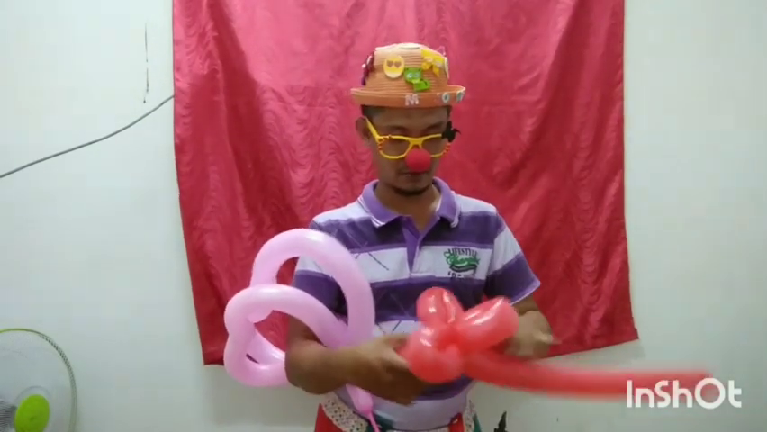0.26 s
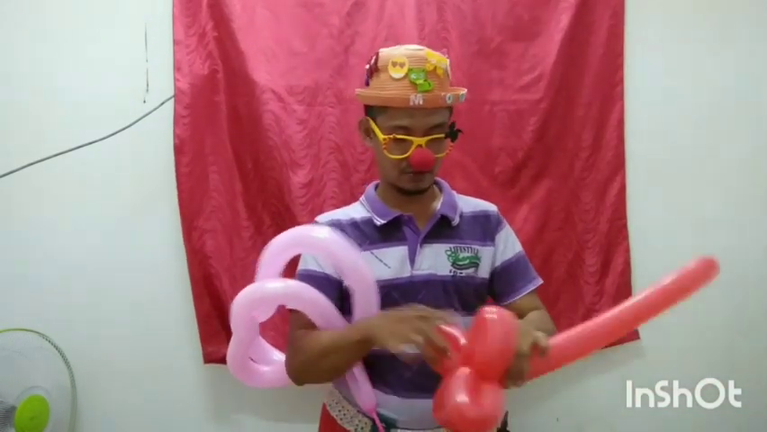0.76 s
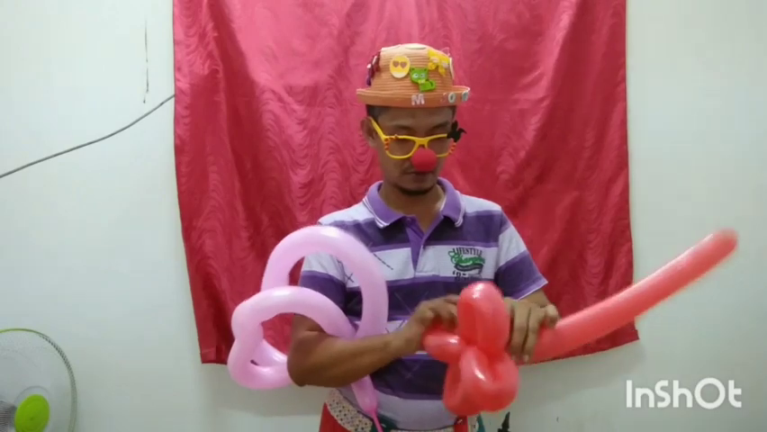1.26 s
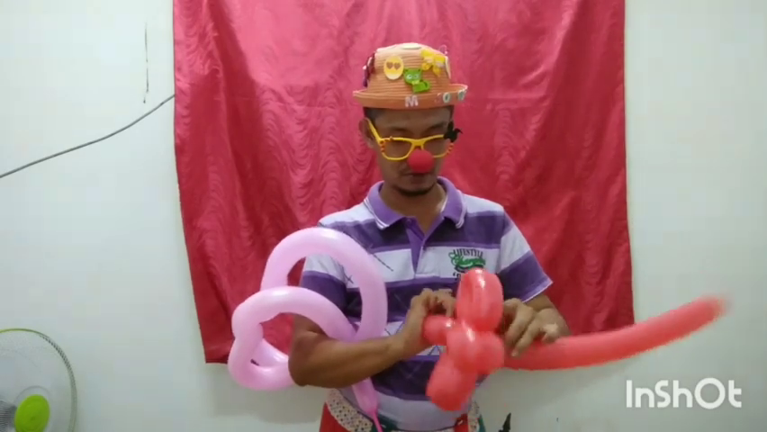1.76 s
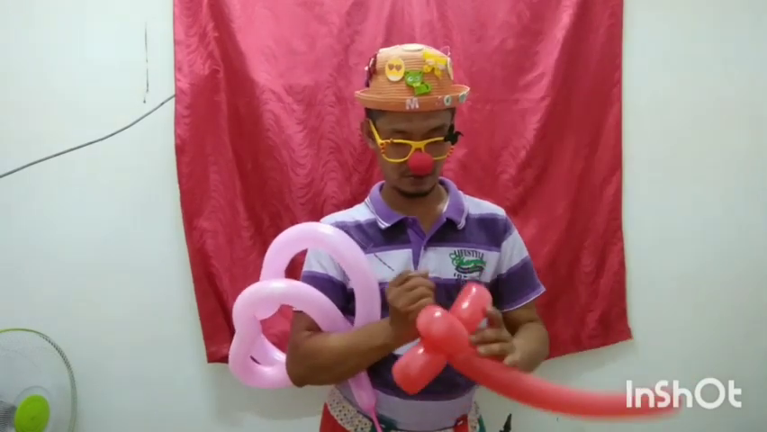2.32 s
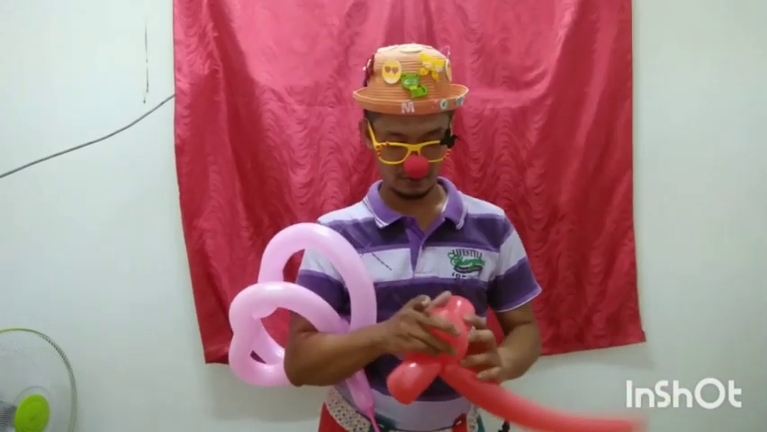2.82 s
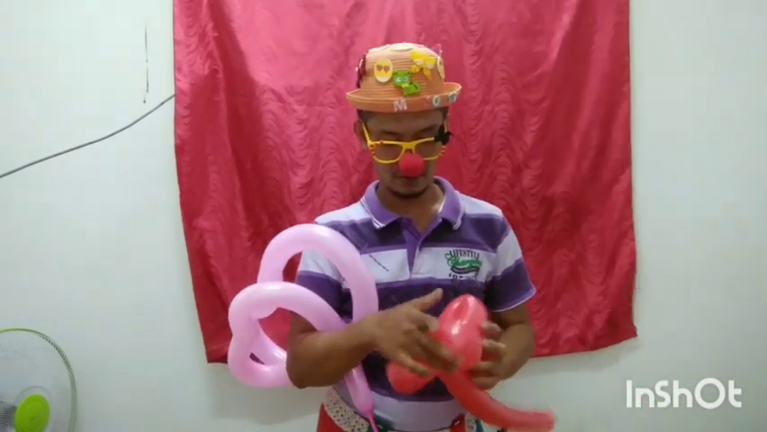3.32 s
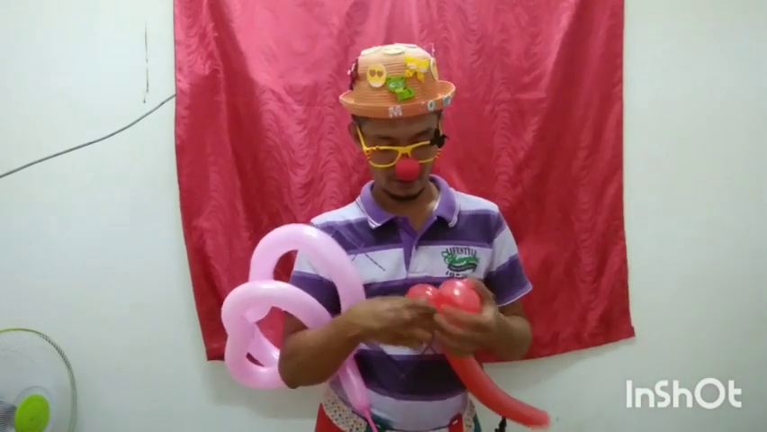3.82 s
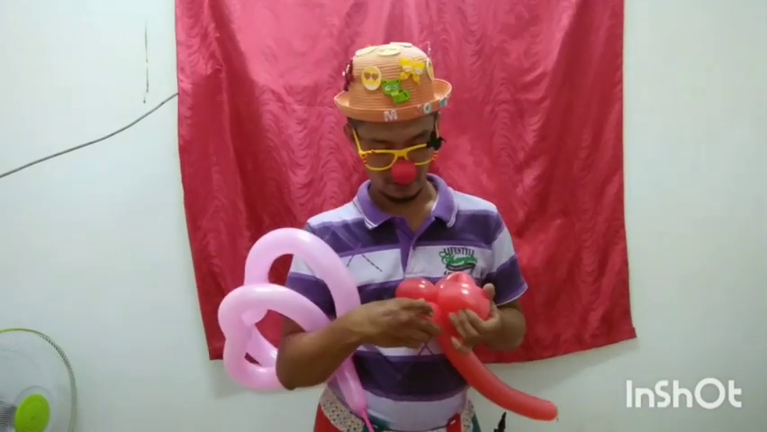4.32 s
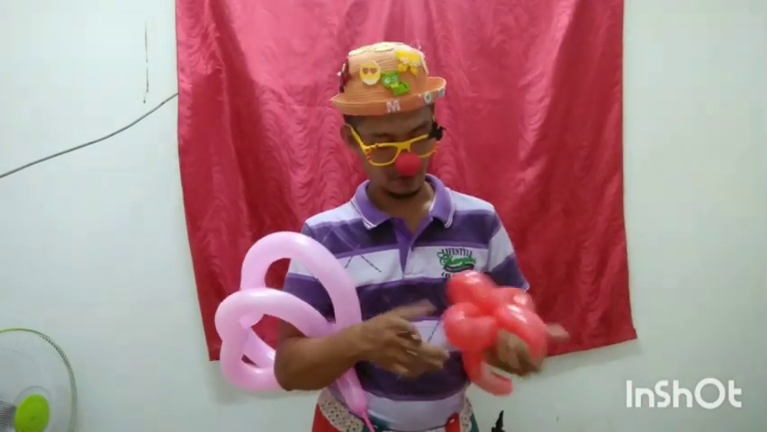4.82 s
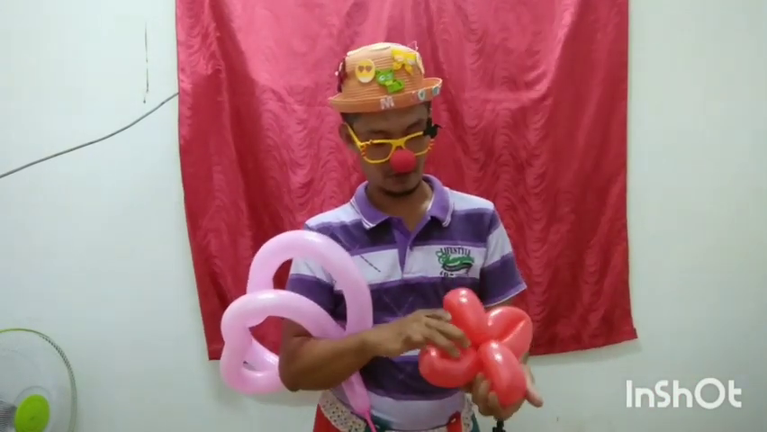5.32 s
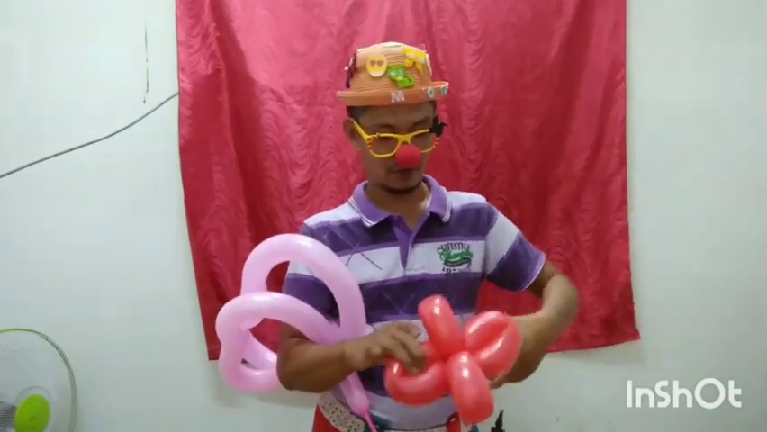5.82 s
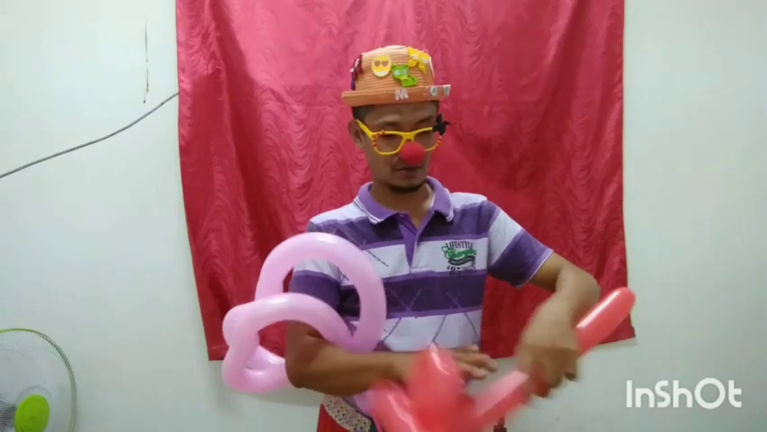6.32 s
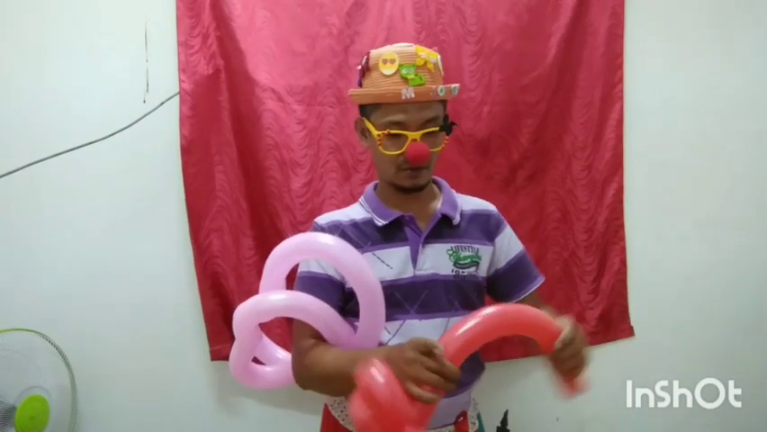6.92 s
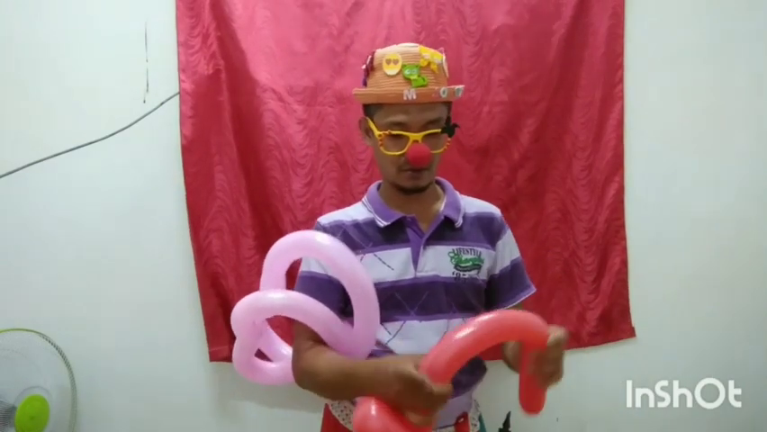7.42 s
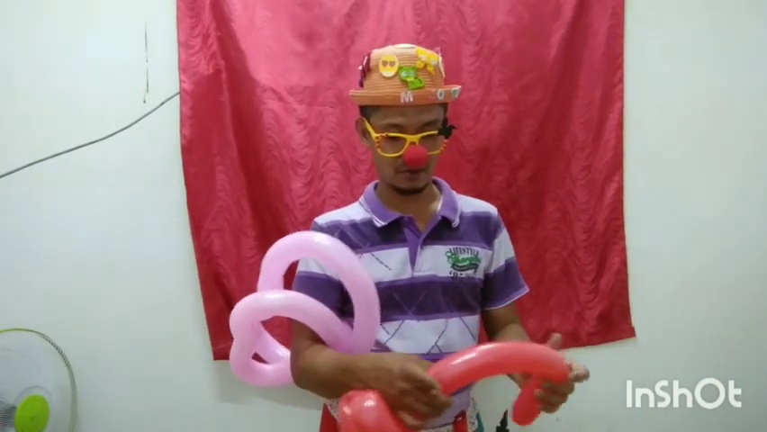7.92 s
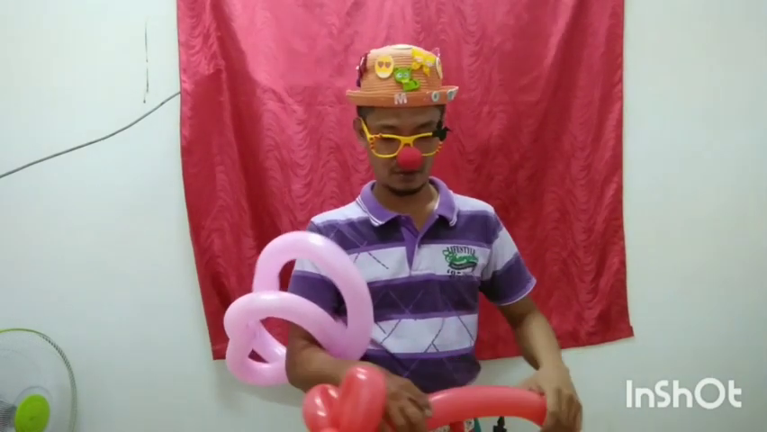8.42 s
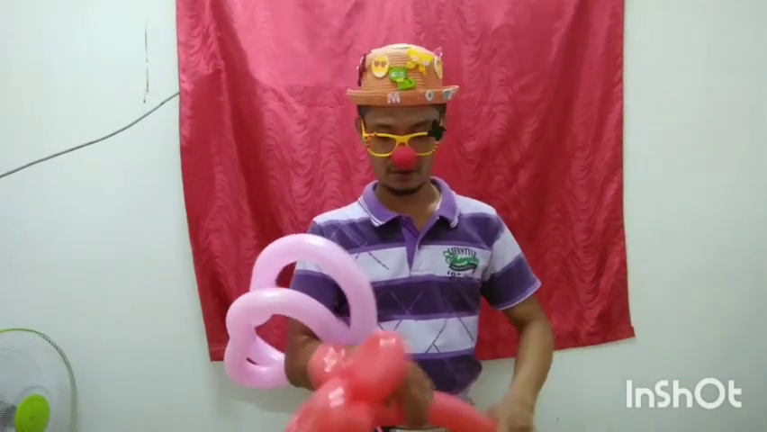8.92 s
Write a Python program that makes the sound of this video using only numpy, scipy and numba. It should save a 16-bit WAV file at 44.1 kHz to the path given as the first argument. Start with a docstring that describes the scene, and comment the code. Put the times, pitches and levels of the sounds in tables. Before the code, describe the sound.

Hands twist a long balloon, making uneven rubbery creaks, crackles and snaps, with short pauses and a faint hum behind.

```python
"""Latex balloons, twisted and rubbed by hand in bursts, two metres from a phone in a small bare room.
Swarms of stick-slip clicks ring the skin and the air inside; folds grip, then snap loose.
Even slipping groans, a dragged finger squeals, the bundle knocks against the palm.
A fan runs behind; the phone's gate ducks the pauses."""
import sys
import numpy as np
from scipy import signal
from scipy.fft import rfft, irfft, next_fast_len
from scipy.io import wavfile
from scipy.ndimage import uniform_filter1d
from numba import njit

SR = 44100
rng = np.random.default_rng(int(sys.argv[2]) if len(sys.argv) > 2 else 0)


def store_wav(level_fs):
    """Save 16-bit WAV to argv[1]."""
    pcm = np.round(np.clip(np.atleast_2d(level_fs), -1, 1) * 32767)
    wavfile.write(sys.argv[1], SR, pcm.T.astype(np.int16))


N = 403956

# folds slipping loose: (time [s], level [dB], relative low-band level [dB])
FOLD_SNAPS = [(0.227, -45, -19), (0.341, -38, -10), (0.408, -14.5, -6), (1.495, -13.5, -8.5),
              (2.13, -11.5, -4), (2.5539, -23, -26), (2.805, -9.5, -13.5), (2.8239, -10, -17.5),
              (3.717, -29.5, -31), (3.8784, -35, -17), (3.9842, -4, -8.5), (5.1027, -31, -14),
              (5.1928, -12, -21), (5.4487, -23, -17), (5.822, -32, -18), (6.2016, -33, -20),
              (6.3743, -41.5, -9), (6.4126, -11.5, -33), (7.1927, -30.5, -26.5), (7.3313, -23.5, -12),
              (7.5885, -9, -18), (7.7485, -19.5, -3), (7.8486, -17.5, -13), (8.1273, 0, -12.5),
              (8.317, -23, -6), (8.539, -26, -28), (8.6739, -20, -18)]
# skin scrape spectrum: (frequency [Hz], gain [dB])
SCRAPE_SPECTRUM = [(400, -63.5), (1500, -23.5), (2200, -3), (3000, 2), (4200, -3), (6000, -3), (8000, -20)]
# dry crackle spectrum: (frequency [Hz], gain [dB])
CRACKLE_SPECTRUM = [(1500, -56.5), (5000, -16.5), (7000, -2.5), (9000, -1), (12000, 1), (14500, -10),
                    (16500, -10.5)]


def rubbing():
    """Swarms of slips excite skin and air; the resonances move as the bubbles are squeezed."""
    # lower skin spectrum: (frequency [Hz], gain [dB])
    lower_spectrum = [(200, -54.5), (600, -16), (950, -0.5), (1200, 0), (1600, 3), (2100, -1.5),
                      (3000, -29)]
    envelope, lower_share, boom_share, crackle_share, air_hz = strokes()
    fine = slips(rate_hz=3500, spread_db=3.03, patchy_db=1.56)
    coarse = slips(rate_hz=500, spread_db=3.5, patchy_db=0.63)
    boom = unit(ring(coarse, air_hz, width_hz=320.)
                + 0.39 * ring(coarse, 0.62 * air_hz, width_hz=98.)
                + 0.27 * ring(coarse, 1.3 * air_hz, width_hz=300.))
    # less lower skin: tauter, higher ring
    lower_db = np.clip(20 * np.log10(lower_share), -16, 8)
    taut_hz = (2430 - 30.5 * lower_db) * undb(0.73 * walk(9))
    scrape = unit(shape(fine, SCRAPE_SPECTRUM, undb)) + undb(-13) * ring(fine, taut_hz, width_hz=450.)
    bubble_hz = 1450 * undb(1.33 * walk(7))  # smaller bubbles, wandering with the grip
    lower = unit(shape(fine, lower_spectrum, undb)) + 0.39 * ring(fine, bubble_hz, width_hz=250.)
    crackle = unit(shape(fine, CRACKLE_SPECTRUM, undb))
    return envelope * (scrape + lower_share * lower + crackle_share * crackle + boom_share * boom)


def strokes():
    """Rubs swell and fade; overlaps add in power, and the loudest dominates the timbre."""
    # hand rubs: (peak time [s], 20 dB swell [s], 20 dB fade [s], level [dB], relative lower skin [dB],
    # relative air boom [dB], relative crackle [dB], air resonance [Hz])
    rubs = [(0.009, 0.15, 0.058, -39, 1.5, -8, 5, 658), (0.151, 0.45, 0.105, -54.5, -0.5, -18.5, -9, 601),
            (0.243, 0.05, 0.046, -43.5, -5.5, -30, -23, 761), (0.347, 0.111, 0.167, -57, 4, -2.5, -5, 669),
            (0.416, 0.045, 0.098, -33, -9, -5, 4.5, 666), (0.567, 0.023, 0.078, -53.5, 1.8, 2, -11, 711),
            (0.696, 0.085, 0.393, -36, -1.5, -1, -1.5, 568), (0.859, 0.03, 0.62, -39, -4, 6.5, 0, 652),
            (1.027, 0.16, 0.099, -23.5, -3.7, -5.5, 0.2, 659), (1.163, 0.186, 0.15, -33, -8, 0, 1.8, 679),
            (1.267, 0.054, 0.19, -31, -10, -0.5, 0.5, 650), (1.401, 0.25, 0.052, -33, -10.5, 1, 0.0, 679),
            (1.507, 0.066, 0.12, -34.5, -7, -3, -10, 670), (1.762, 0.11, 0.1, -32, -0.4, 4.7, 4.5, 598),
            (1.849, 0.1, 0.14, -46, -2, 5.5, -9, 556), (2.026, 0.226, 0.12, -53.5, -0.1, 6.8, -4, 526),
            (2.168, 0.043, 0.11, -26.5, -7, -5, -1.7, 669), (2.323, 0.03, 0.16, -49.5, -6, -5, 4, 454),
            (2.566, 0.058, 0.117, -42, -14.3, -30, -1.5, 619), (2.705, 0.135, 0.52, -47, -2, -1.5, -1, 658),
            (2.817, 0.028, 0.131, -27, -3, -9.5, 4.5, 536), (2.968, 0.044, 0.1, -31, -7, -0.5, 0.4, 615),
            (3.109, 0.1, 0.14, -42, 2, 5, 0, 496), (3.256, 0.065, 0.096, -26.5, -19.5, -12.5, -0.5, 710),
            (3.742, 0.078, 0.11, -47, -9, -13, 4.5, 603),
            (3.912, 0.083, 0.484, -45.5, -6.5, -29.5, -4.9, 796),
            (3.993, 0.079, 0.17, -32, -1.4, -6, 1.9, 699), (4.127, 0.2, 0.085, -30, 0.3, -1, -1, 752),
            (4.225, 0.16, 0.31, -31, -0.9, -3, 1, 660), (4.34, 0.066, 0.11, -30.5, 1.2, 6.7, 1.2, 683),
            (4.459, 0.2, 0.088, -33.5, 0.1, 0.5, -1.5, 665), (4.656, 0.15, 0.11, -19.5, -2, -6, -0.3, 730),
            (4.831, 0.145, 0.16, -40, -4.5, -6.5, 4, 804), (4.958, 0.098, 0.089, -44.5, -1, -5, 4.8, 844),
            (5.127, 0.043, 0.09, -41.5, -2, -13, 3, 577), (5.196, 0.031, 0.466, -38.5, -9.5, -8, 0, 788),
            (5.275, 0.033, 0.12, -31, -2, -19.5, -5, 771), (5.351, 0.16, 0.13, -34, -7.5, -10.5, -1.5, 707),
            (5.457, 0.056, 0.103, -30, -7.5, -7.5, -2, 505),
            (5.561, 0.078, 0.082, -17.5, -8.5, -4.5, -2.8, 630),
            (5.685, 0.15, 0.083, -41.5, -17.5, -24, 6.5, 590),
            (5.857, 0.084, 0.14, -46, -2.5, -12.5, 1.1, 704), (6.105, 0.13, 0.092, -57.5, 3, 9.5, -18, 536),
            (6.233, 0.373, 0.098, -50.5, -7.5, -23, -17, 532),
            (6.433, 0.083, 0.092, -40, -6.5, -4, -0.5, 409),
            (6.577, 0.051, 0.206, -40.5, -12, -10.5, -8, 746),
            (6.651, 0.057, 0.142, -40.5, -2.5, -4.5, 4, 767),
            (6.848, 0.051, 0.19, -47.5, -4, -17, -13.0, 720),
            (7.21, 0.042, 0.13, -48.5, -9.5, 3.5, 12, 587), (7.345, 0.038, 0.155, -49.5, 2, 6, 6, 701),
            (7.429, 0.13, 0.12, -43, -4, -3, 4, 633), (7.518, 0.04, 0.168, -55.5, -4.3, -1.5, -14.4, 339),
            (7.59, 0.038, 0.095, -32, -3.5, -13, 0, 755),
            (7.649, 0.057, 0.177, -40.5, -22.4, -7.5, 4.3, 698), (7.757, 0.039, 0.103, -36, 0, 0, -1, 658),
            (7.859, 0.13, 0.092, -35.5, -12.5, -3, 6.5, 699), (8.084, 0.12, 0.029, -49, -12, -1.5, 8, 403),
            (8.135, 0.034, 0.062, -25.5, -4.5, -5, 4.5, 595), (8.19, 0.06, 0.117, -34, 0, -2.5, -15, 559),
            (8.302, 0.14, 0.1, -31, -4.5, -8.5, 3.3, 700),
            (8.564, 0.042, 0.069, -33.5, -11.5, -39, -2, 704), (8.684, 0.051, 0.14, -34.5, 0, -10, -9, 612),
            (8.858, 0.03, 0.15, -34, -3, -5, -1.7, 709), (8.951, 0.079, 0.056, -38, -4.5, -6, 4, 758),
            (9.086, 0.165, 0.21, -50.5, -3.5, -7, -11.3, 767)]
    peak_s, swell_s, fade_s, rub_db, lower_db, boom_db, crackle_db, air_hz = np.transpose(rubs)[:, :, None]
    t = np.arange(0, N / SR + 0.01, 0.002)
    from_peak = np.where(t < peak_s, (peak_s - t) / swell_s, (t - peak_s) / fade_s)
    power = undb(2 * rub_db - 40 * from_peak ** 1.166) + 1e-30  # exponent > 1 rounds the peak
    total = power.sum(axis=0)
    shares = [np.sqrt((power * undb(2 * db)).sum(axis=0) / total) for db in (lower_db, boom_db, crackle_db)]
    mean_air_hz = (power * air_hz).sum(axis=0) / total
    return [np.interp(np.arange(N) / SR, t, curve) for curve in (np.sqrt(total), *shares, mean_air_hz)]


def slips(rate_hz, spread_db, patchy_db):
    """Random stick-slip clicks, many small and few large, in uneven patches."""
    hit = rng.random(N) < rate_hz / SR
    size_db = spread_db * np.minimum(rng.exponential(1, N), 5.5) + patchy_db * walk(60)
    return hit * undb(size_db) * np.sign(rng.standard_normal(N))


def sticking():
    """Gain dip as the rubber grips just before a fold slips loose."""
    dip_db, lead_s = -2, 0.037
    t = np.arange(N) / SR
    return undb(sum(dip_db * (t < at_s) * np.exp(-np.abs(t - at_s) / lead_s) for at_s, *_ in FOLD_SNAPS))


def snaps():
    """A fold lets go: a sharp tick, then a fading shower of slips."""
    tick_s, shower_t60_s = 0.00049, 0.27
    high, low, t = np.zeros(N), np.zeros(N), np.arange(SR // 2) / SR
    envelope = np.exp(-t / tick_s) + 0.28 * 1000 ** (-t / shower_t60_s)
    for at_s, db, low_db in FOLD_SNAPS:
        i = int(at_s * SR)
        burst = (rng.standard_normal(len(t)) * envelope)[:N - i]
        high[i:i + len(t)] += undb(db) * burst
        low[i:i + len(t)] += undb(db + low_db) * burst
    for hz in (900., 700.):
        low = bandpass(low, np.full(N, hz), width_hz=1400.)
    return 0.58 * (shape(high, SCRAPE_SPECTRUM, undb) + shape(high, CRACKLE_SPECTRUM, undb)) + 3.8 * low


def groans():
    """Even slipping sings: an unsteady gliding tone with a weak octave."""
    # low groans and thin squeaks: (start [s], length [s], first pitch [Hz], last pitch [Hz], level [dB])
    glides = [(1.593, .17, 576, 525, -35.5), (1.768, 0.069, 412, 420, -38), (1.847, 0.052, 526, 570, -36.5),
              (2.009, 0.076, 305, 300, -46), (2.056, 0.047, 388, 377, -50), (3.095, 0.16, 449, 434, -38.5),
              (5.445, 0.14, 1090, 1050, -39), (5.648, .1, 1920, 2040, -44.5), (6.066, .1, 524, 476, -51.5),
              (6.45, .05, 398, 404, -38.5), (7.494, 0.086, 305, 338, -45.5), (8.042, 0.11, 429, 401, -47.5),
              (8.672, 0.037, 576, 600, -36)]
    edge_s, sag_db = 0.0092, -2.5
    out, waver, throb = np.zeros(N), walk(70), walk(45)
    for start_s, length_s, first_hz, last_hz, db in glides:
        t = np.arange(int(length_s * SR)) / SR
        span = slice(int(start_s * SR), int(start_s * SR) + len(t))
        hz = np.linspace(first_hz, last_hz, len(t)) * (1 + 0.045 * waver[span])
        phase = 2 * np.pi * np.cumsum(hz) / SR
        edge = np.clip(np.minimum(t, length_s - t) / edge_s, 0, 1)
        level = undb(db + sag_db * t / length_s + 1.6 * throb[span])
        out[span] += edge * level * np.sqrt(2) * (np.sin(phase) + 0.2 * np.sin(2 * phase))
    return out


def squeals():
    """A finger drags over taut skin: dense slips ring one wandering resonance."""
    # finger drags: (start [s], length [s], resonance [Hz], level [dB])
    drags = [(3.21, 0.11, 2800, -40), (6.799, 0.19, 2750, -43)]
    edge_s = 0.025
    out, t = np.zeros(N), np.arange(N) / SR
    rasp = slips(rate_hz=2500, spread_db=2.2, patchy_db=3.6)
    grip = undb(0.5 * walk(25))
    for start_s, length_s, hz, db in drags:
        edge = np.clip(np.minimum(t - start_s, start_s + length_s - t) / edge_s, 0, 1)
        out += undb(db) * edge * ring(rasp, hz * grip, width_hz=1200.)
    return out


def knocks():
    """Soft blows against the palm ring the bundle's hollow modes."""
    # blows: (time [s], level [dB])
    blows = [(5.535, -22.5), (5.549, -20), (5.58, -29)]
    # low modes of the bundle: (frequency [Hz], level [dB])
    hollow_modes = [(135, -5), (180, -1.5), (245, 0)]
    attack_s, t60_s = 0.002, 0.11
    out, t = np.zeros(N), np.arange(SR // 2) / SR
    body = sum(undb(db) * np.sin(2 * np.pi * hz * t) for hz, db in hollow_modes)
    body *= (1 - np.exp(-t / attack_s)) * 1000 ** (-t / t60_s)
    for at_s, db in blows:
        i = int(at_s * SR)
        out[i:i + len(t)] += undb(db) * body
    return out


def room(x):
    """Direct path plus dense reflections; both change as the hands move the balloons."""
    t60_s, predelay_s, build_s, wet = 0.15, 0.002, 0.0016, undb(2)
    t, hop = np.arange(SR // 2) / SR, SR // 14
    decay = 1000 ** (-t / t60_s) * np.clip((t - predelay_s) / build_s, 0, 1)
    decay /= np.sqrt(np.sum(decay ** 2))
    window = np.sin(np.pi * np.arange(2 * hop) / (2 * hop))
    x = np.pad(x, (hop, 2 * hop))
    direct, reflected = np.zeros((2, N + SR)), np.zeros((2, N + 2 * SR))
    for i in range(0, N + hop, hop):
        piece = window * x[i:i + 2 * hop]
        lag = rng.integers(0, 24)  # right channel, samples
        direct[0, i:i + 2 * hop] += window * piece
        direct[1, i + lag:i + lag + 2 * hop] += window * piece
        echo = signal.fftconvolve(piece[None], decay * rng.standard_normal((2, len(t))), axes=1)
        reflected[:, i:i + echo.shape[1]] += echo
    return (direct[:, hop:hop + N] + wet * diffuse(*reflected[:, hop:hop + N])) / np.sqrt(1 + wet ** 2)


def fan():
    """Air noise and a wavering motor hum."""
    # air noise spectrum: (frequency [Hz], relative density [dB])
    air_spectrum = [(15, -48), (25, -14), (76, 1.5), (489, -7.5), (2480, -12.5), (4740, -22.5),
                    (5430, -11.5), (8140, -19.5), (11600, -22.5), (16000, -33.5)]
    air = diffuse(*(unit(shape(rng.standard_normal(N), air_spectrum, undb)) for _ in range(2)))
    motor_time_s = np.cumsum(1 + 0.018 * walk(9)) / SR
    hum = sum(undb(db + 0.68 * walk(15)) * np.sqrt(2) * np.sin(2 * np.pi * hz * motor_time_s)
              for hz, db in ((77, -59.5), (154, -68)))
    return undb(-54.5) * air + hum


def diffuse(a, b):
    """Stereo from two unrelated signals: alike in the bass, unlike in the treble."""
    # room field: (frequency [Hz], left-right coherence [0..1])
    coherence = [(60, 1), (130, 0.94), (290, 1), (640, 0.24), (1410, 0.03), (3100, 0.074), (6820, 0.01),
                 (15000, 0.02)]
    mid = shape(a, coherence, lambda c: np.sqrt((1 + c) / 2))
    side = shape(b, coherence, lambda c: np.sqrt((1 - c) / 2))
    return np.array([mid + side, mid - side])


def ring(x, hz, width_hz):
    """Moving resonance, applied twice for steep flanks; unit RMS."""
    return unit(bandpass(bandpass(x, hz, width_hz), hz, width_hz))


@njit
def bandpass(x, hz, width_hz):
    """State-variable filter, unity gain at its moving centre."""
    y, band_state, low_state = np.empty(len(x)), 0., 0.
    for i in range(len(x)):
        g, damping = np.tan(np.pi * hz[i] / SR), width_hz / hz[i]
        band = (band_state + g * (x[i] - low_state)) / (1 + g * (g + damping))
        band_state = 2 * band - band_state
        low_state += 2 * g * band
        y[i] = damping * band
    return y


def shape(x, table, gain):
    """Weights each frequency by gain(table value), interpolated in log frequency."""
    hz, value = np.transpose(table)
    size = next_fast_len(len(x))
    log_hz = np.log(np.maximum(np.fft.rfftfreq(size, 1 / SR), 1))
    return irfft(rfft(x, size) * gain(np.interp(log_hz, np.log(hz), value)), size)[:len(x)]


def walk(rate_hz):
    """Random steps, smoothed twice; spread near 1."""
    hold = int(SR / rate_hz)
    steps = np.repeat(rng.standard_normal(N // hold + 1), hold)
    return 1.56 * uniform_filter1d(uniform_filter1d(steps, hold), hold)[:N]


def undb(db):
    return 10 ** (np.asarray(db) / 20)


def unit(x):
    return x / np.sqrt(np.mean(x ** 2))


def scene():
    """Balloons in the room over the fan; part of the groans bypasses the room."""
    tones = groans()
    balloons = sticking() * rubbing() + squeals() + snaps() + knocks() + undb(-4) * tones
    return undb(1) * room(balloons) + undb(-4.5) * tones + fan()


def record(dry):
    """Phone: brighter left port, gate (deeper in the bass), soft clipping, top cut."""
    # microphone port imbalance: (frequency [Hz], left minus right [dB])
    ports = [(60, 5.5), (110, -3), (200, 0), (380, 0), (700, 1.5), (1290, 1), (2380, 0.5), (4400, -0.5),
             (8120, 4), (15000, 14.5)]
    crossover_hz, top_hz = 200, 15800
    threshold_db, detect_s, smooth_s = -47.5, 0.0088, 0.02
    x = np.array([shape(dry[0], ports, lambda db: undb(db / 2)),
                  shape(dry[1], ports, lambda db: undb(-db / 2))])
    bass = signal.sosfiltfilt(signal.butter(2, crossover_hz, fs=SR, output="sos"), x)
    upper = x - bass
    level_db = 10 * np.log10(uniform_filter1d(np.mean(upper ** 2, axis=0), int(detect_s * SR)) + 1e-12)
    duck_db = np.clip(3.9 * (level_db - threshold_db), -24, 0)
    duck_db = uniform_filter1d(duck_db, int(smooth_s * SR))
    x = upper * undb(duck_db) + bass * undb(1.3 * duck_db)
    x = np.tanh(1.027 * x) / 1.17
    return signal.sosfilt(signal.ellip(12, 0.2, 90, top_hz, fs=SR, output="sos"), x)


dry = scene()
out = record(dry)
store_wav(out)
```